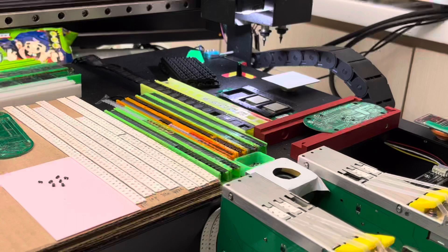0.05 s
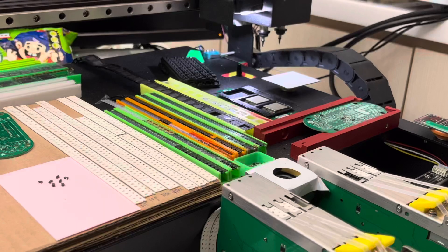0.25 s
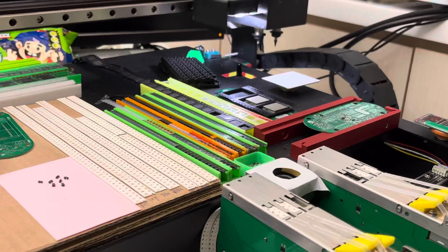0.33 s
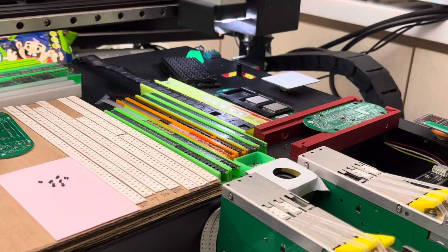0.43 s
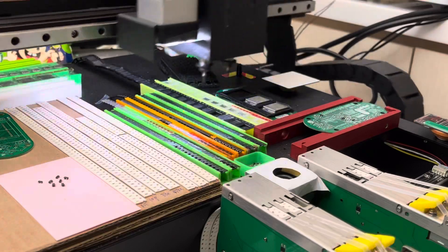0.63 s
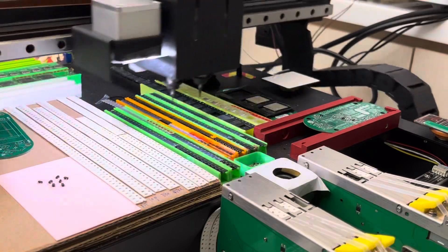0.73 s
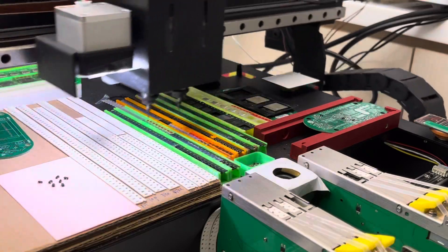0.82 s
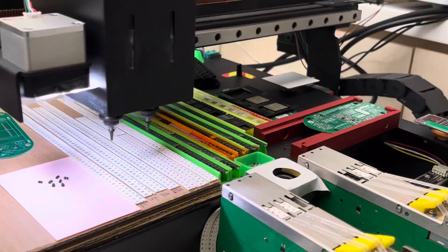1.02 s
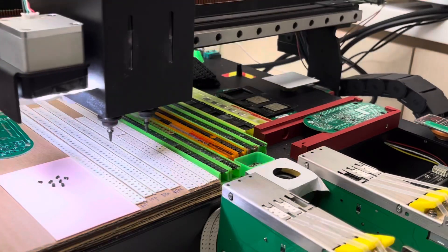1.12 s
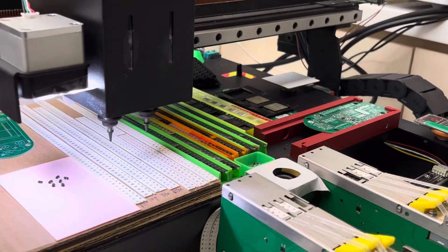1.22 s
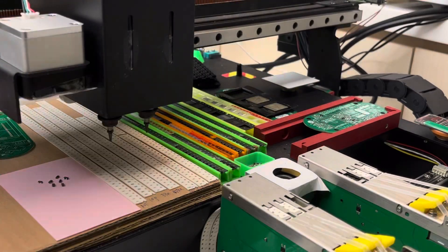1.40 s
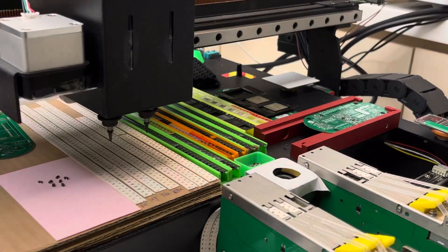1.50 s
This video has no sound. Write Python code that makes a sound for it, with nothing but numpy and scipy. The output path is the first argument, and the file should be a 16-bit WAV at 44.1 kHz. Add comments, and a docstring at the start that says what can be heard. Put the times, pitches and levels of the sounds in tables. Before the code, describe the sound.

A quick motor whir rises and falls as a machine gantry slides, over a low hum.

```python
"""A stepper motor drives the gantry of a desktop pick-and-place machine through one move. Its tones rise and
fall with speed and force the resonances of the frame, while the carriage hisses on its rails, a loose part
buzzes and the cable chain rattles. A valve clicks before the move; afterwards the machine settles with small
knocks over the steady hum of its pump, until a thump as the next move begins."""
import sys
import numpy as np
from scipy import signal
from scipy.fft import rfft, irfft
from scipy.io import wavfile
from scipy.ndimage import uniform_filter1d

SR = 44100
rng = np.random.default_rng(int(sys.argv[2]) if len(sys.argv) > 2 else 0)


def log_audio(samples):
    """Write samples as a 16-bit WAV file to the path given in sys.argv[1]."""
    # one column per channel
    frames = np.atleast_2d(samples).T
    # limit to full scale, then quantise
    limited = np.clip(frames, -1, 1)
    pcm = np.round(limited * 32767).astype(np.int16)
    wavfile.write(sys.argv[1], SR, pcm)


N = 68355

# Spectra give shape only: their levels are relative and per unit bandwidth.
PUMP_HUM = [(60, -59.5), (91.5, -56), (123, -62.5), (6659, -90)]  # hum and a thin whistle: f/Hz, level/dB
PUMP_RUMBLE = [(20, -23), (50, 1), (90, -9), (150, -10), (320, -11), (450, -19.5), (1000, -28.5),
               (4000, -50.5)]  # spectrum: f/Hz, level/dB
HEAD_WHINE = [(270, -93), (317.6, -66.5), (382, -78), (517, -71), (673, -70), (797, -76)]  # partials: f/Hz, relative level/dB
AIR_RUSH = [(100, -30), (300, 2.5), (700, 7), (1100, -4), (1800, -10), (3000, -16), (6500, -18),
            (13500, -19.5), (15000, -25)]  # spectrum: f/Hz, level/dB
AIR_GAIN = [(.05, -5), (.18, -10), (1.15, 0), (1.22, -5.5), (1.29, -5), (1.36, -1), (1.5, 1.5)]  # envelope of air and whine: t/s, gain/dB
VALVE_BLOWS = [(.0797, -44), (.0813, -44.5), (.092, -56), (1.108, -57.5)]  # impacts: t/s, level/dB
VALVE_MODES = [(2340, -8, .026), (7000, -13, .006), (11700, -14, .006), (13700, -13, .006)]  # modes: f/Hz, relative level/dB, T60/s
VALVE_CRACK = [(1000, -35), (2400, -7.5), (5000, -7), (7000, 4.5), (9000, -1), (13500, 6), (15500, -2.5)]  # spectrum: f/Hz, level/dB
MOTOR_PITCH = [(0.2, 24.86), (0.26, 94.8), (0.315, 193.7), (0.36, 266.9), (0.402, 353.1), (0.46, 460.4),
               (0.55, 632.6), (0.6, 688), (0.65, 696), (0.705, 685.4), (0.754, 602.4), (0.842, 442),
               (0.9, 353.4), (0.98, 211.7), (1.04, 114.2), (1.11, 30.9)]  # main tone, proportional to speed: t/s, f/Hz
DRIVE_GAIN = [(.21, -1), (.31, -0.5), (.38, -0.5), (.44, 1.5), (.51, 2), (.64, -4), (.8, -1), (.9, -0.5),
              (.98, -2), (1.08, -1.5), (1.13, -6)]  # envelope of the force on the frame: t/s, gain/dB
# motor partials: ratio to the main tone, force level/dB (starting, full speed, stopping), flutter/1
MOTOR_PARTIALS = [(.26, -62, -43.5, -55, 0.042), (.52, -32, -37.5, -30, 0.015),
                  (1, -39, -33.5, -35.5, 0.0047), (2.04, -33.5, -64.5, -30, 0.0612),
                  (2.8, -43.5, -67.5, -43.5, 0.0302)]
# frame modes: f/Hz, bandwidth/Hz, gain for tones/dB, judder drive/dB (starting, full speed, stopping)
FRAME_MODES = [(194.8, 26, 2.5, -48.5, -42.5, -39.5), (213.7, 49, -2, -44.5, -53.5, -44.5),
               (267.1, 17.1, 1.5, -40.5, -45.5, -37.5), (375, 27.5, -13.5, -61.5, -46, -51),
               (418.6, 45.2, 2, -67, -47, -52.5), (556, 67.5, -2, -48, -51, -67),
               (695, 46, -1.5, -60.5, -46, -60.5), (817, 72, -11.5, -61, -57.5, -61),
               (899, 35, -28, -65.5, -60, -80), (1184, 82, -19, -92, -49.5, -76),
               (1804, 234, -21, -84, -52.5, -84)]
RAIL_ROLL = [(50, -26), (90, 8.5), (200, 4), (400, -2), (800, -2), (1100, -1), (1500, -2.5), (2000, -7),
             (2800, -14.5), (5000, -19), (15000, -27)]  # spectrum of the bearings: f/Hz, level/dB
BELT_HISS = [(500, -13), (2000, 0.5), (3200, 2.5), (5000, -1.5), (7200, 1.5), (8400, -3.5), (10000, 3),
             (12000, 0), (13700, 2.5), (15500, -5)]  # spectrum, also of a knock's tick: f/Hz, level/dB
HISS_ENVELOPE = [(.2, -81.5), (0.268, -65), (.34, -59), (.47, -51.5), (.55, -46), (.71, -44), (.79, -49),
                 (0.891, -51.5), (1.04, -66.5), (1.12, -85)]  # swell of the hiss: t/s, level/dB
LOOSE_RASP = [(300, -0.5), (600, 1.5), (830, 7), (1150, 1), (1450, -14), (1900, -10.5), (3000, -12.5),
              (15000, -36)]  # spectrum of the loose part: f/Hz, level/dB
BENCH_BOOM = [(.2, 70.2, -58), (.25, 65.8, -52), (.35, 74, -76), (.45, 81, -43), (.54, 80, -45),
              (.6, 90.5, -46), (.66, 81.8, -44.5), (.73, 80.5, -41.5), (.78, 85, -59), (.86, 95.7, -52),
              (.96, 102, -52.5), (1.06, 100.1, -48.5), (1.135, 88, -45.5), (1.17, 85, -59)]  # low gliding tone: t/s, f/Hz, level/dB
KNOCK_BLOWS = [(0.21, -41.5, -83, -58, 0.04), (1.04, -34, -59.5, -76, 0.01), (1.228, -54, -99, -60, 0.084),
               (1.32, -56, -67, -54.5, 0.04), (1.535, -38, -69, -61.5, 0.18)]  # impacts: t/s, thud/dB, tick/dB, clack/dB, decay time/s
THUD = [(40, -14), (90, 1.5), (170, 10.5), (300, -21), (700, -8.5), (1000, -34.5), (2000, -31.5),
        (4000, -35), (15000, -89)]  # spectrum: f/Hz, level/dB
CLACK = [(300, 3), (800, 10.5), (1900, 0.5), (3000, -10.5), (6000, -20.5), (15000, -32)]  # spectrum for knocks and chain: f/Hz, level/dB
CHAIN_BLOWS = [(.422, -43), (.441, -40), (.457, -42), (.473, -41.5), (.527, -47), (.853, -43.5),
               (.872, -46)]  # impacts of the links: t/s, level/dB
CHAIN_MODES = [(802, 3, 0.05), (883, -2, 0.048), (1010, -2.5, .055), (1400, -11, 0.043), (2000, -15, 0.04)]  # modes: f/Hz, relative level/dB, T60/s
THIN_TONE = [(.59, 935, -62), (.65, 908, -52), (.7, 890, -49), (.73, 848, -56), (.78, 836, -52),
             (.82, 880, -54), (.86, 910, -53), (.91, 895, -66)]  # high gliding tone: t/s, f/Hz, level/dB
STEREO_WIDTH = [(60, -17), (300, -8), (700, -1.5), (1400, 1), (2200, -16.5), (3000, -5.5), (4400, -28),
                (6500, -2.5), (8400, -49), (10000, 7), (15000, -32)]  # spread of the noises: f/Hz, side minus mid/dB
LEFT_LAG = [(4900, 0), (6800, 1.2), (7850, 3.05), (8850, 3.22), (11100, 6.1), (13000, 6.6), (14200, 8.2),
            (14750, 9.35), (16000, 9.45)]  # treble phase lag of the left channel behind the right: f/Hz, phase/rad

FULL_SPEED_HZ = 700
START_S, STOP_S, ATTACK_S, RELEASE_S = 0.198, 1.094, 0.0041, 0.037


def undb(db):
    """Amplitude ratio of a level in decibels."""
    return 10 ** (np.asarray(db) / 20)


def unit(x):
    """Normalisation to rms 1."""
    return x / np.sqrt(np.mean(x ** 2))


def clock():
    """Sample times in seconds."""
    return np.arange(N) / SR


def curve(points):
    """Linear interpolation in time between (t, value) points."""
    return np.interp(clock(), *np.array(points).T)


def drift(rate_hz):
    """Smoothed random steps form a slow modulation of rms 1."""
    size = int(SR / rate_hz)
    steps = np.repeat(rng.standard_normal(N // size + 1), size)
    return unit(uniform_filter1d(uniform_filter1d(steps, size), size)[:N])


def response(points):
    """Magnitude response, interpolated in level over log frequency."""
    hz, db = np.array(points, float).T
    return undb(np.interp(np.log(np.fft.rfftfreq(N, 1 / SR) + 1), np.log(hz), db))


def noise(spectrum):
    """Independent mid and side signals add to partly coherent stereo noise of rms 1."""
    mid, side = rfft(rng.standard_normal((2, N))) * response(spectrum)
    width = response(STEREO_WIDTH)
    return unit(irfft(np.array([mid + width * side, mid - width * side]) / np.hypot(1, width), N))


def tone(hz, flutter, flutter_hz, rough_db, rough_hz):
    """A sinusoid of rms 1 undergoes random frequency and amplitude modulation."""
    phase = 2 * np.pi * np.cumsum(hz * (1 + flutter * drift(flutter_hz))) / SR
    return np.sqrt(2) * undb(rough_db * drift(rough_hz)) * np.sin(phase)


def resonate(x, hz, width_hz):
    """A damped resonator with unit gain at its natural frequency."""
    return signal.lfilter(*signal.iirpeak(hz, hz / width_hz, fs=SR), x)


def room(x, wet_db, t60=0.2, low_hz=179):
    """Reverberation adds an exponentially decaying diffuse field to the direct sound."""
    tail = rng.standard_normal((2, N)) * np.exp(-np.log(1000) * clock() / t60)
    tail = signal.sosfilt(signal.butter(2, low_hz, "high", fs=SR, output="sos"), tail)
    tail /= np.sqrt(np.sum(tail ** 2, axis=1, keepdims=True))
    return x + undb(wet_db) * signal.fftconvolve(x[None], tail, axes=1)[:, :N]


def hum(partials):
    """Superposed partials, each wavering slightly, form a line spectrum."""
    return sum(undb(db) * tone(hz, flutter=0.00382, flutter_hz=5.4, rough_db=0.5, rough_hz=14.52)
               for hz, db in partials)


def idle_machine():
    """Tones lie over broadband noise: the pump hums; the head's whine and air grow once it is near."""
    pump = hum(PUMP_HUM) + undb(-57) * noise(PUMP_RUMBLE)
    head = hum(HEAD_WHINE) + undb(-61) * noise(AIR_RUSH)
    return pump + undb(curve(AIR_GAIN)) * head


def strike(blows, modes, crack, crack_db, crack_s=0.0027, scatter_db=2):
    """Each impact gives a noise burst and excites damped modes in a slightly different mixture."""
    out = 0
    for at, blow_db in blows:
        age = np.maximum(clock() - at, 0)
        ring = 0
        for hz, db, t60 in modes:
            polarity, scatter = rng.standard_normal(2)
            amplitude = np.sign(polarity) * undb(db + scatter_db * scatter)
            ring += amplitude * np.sin(2 * np.pi * hz * age) * np.exp(-np.log(1000) * age / t60)
        burst = undb(crack_db) * noise(crack)[0] * (age > 0) * np.exp(-age / crack_s)
        out += undb(blow_db) * (ring + burst)
    return out


def valve():
    """Impact excitation: a valve snaps and bounces, then ticks faintly as the move ends."""
    return room(strike(VALVE_BLOWS, VALVE_MODES, VALVE_CRACK, crack_db=2), wet_db=-7)


def gain_at_speed(start_db, full_db, stop_db, speed):
    """Level varies linearly with speed, on one slope before the peak and another after."""
    slow_db = np.where(np.arange(N) < np.argmax(speed), start_db, stop_db)
    return undb(slow_db + (full_db - slow_db) * speed)


def motor(speed, drive, bass_cut_hz=166, direct_db=-38):
    """Forced vibration: stepper tones sweep through the modes of a frame that radiates little bass."""
    force = 0
    for ratio, start_db, full_db, stop_db, flutter in MOTOR_PARTIALS:
        hz = ratio * FULL_SPEED_HZ * speed
        partial = tone(hz, flutter, flutter_hz=69.98, rough_db=1.33, rough_hz=59)
        force += gain_at_speed(start_db, full_db, stop_db, speed) * partial
    force = signal.sosfilt(signal.butter(4, bass_cut_hz, "high", fs=SR, output="sos"), drive * force)
    ringing = sum(undb(db) * resonate(force, hz, width) for hz, width, db, *_ in FRAME_MODES)
    return undb(direct_db) * force + ringing


def judder(speed, drive):
    """Random excitation keeps the frame's modes ringing: a growl at a crawl, higher rings at speed."""
    out = 0
    for hz, width, _, start_db, full_db, stop_db in FRAME_MODES:
        push = resonate(rng.standard_normal(N), hz, 2 * width)
        push /= np.std(resonate(push, hz, width))
        gain = drive * gain_at_speed(start_db, full_db, stop_db, speed ** 0.75)
        out += resonate(push * gain, hz, width)
    return out


def rails(speed, moving):
    """Rolling noise grows in proportion to speed; the hiss of belt and chain swells in mid-move."""
    roll = undb(-42) * speed * noise(RAIL_ROLL)
    hiss = undb(curve(HISS_ENVELOPE)) * noise(BELT_HISS)
    grain = undb(drift(400))  # 1 dB rms
    return moving * grain * (roll + hiss)


def loose_part(shake, speed, hz=422, width_hz=157):
    """Sympathetic vibration: a loose part chatters once a cycle as motor tones cross its resonance."""
    swing = resonate(resonate(shake, hz, width_hz), hz, 2 * width_hz)
    contact = np.maximum(swing, 0) * speed
    return undb(-55) * unit(contact) * noise(LOOSE_RASP)


def glide(points, **modulation):
    """A modulated tone follows a path of frequency and amplitude, silent beyond its ends."""
    at, hz, db = np.array(points).T
    amplitude = np.interp(clock(), at, undb(db), left=0, right=0)
    return amplitude * tone(np.interp(clock(), at, hz), flutter_hz=60.15, rough_hz=49.9, **modulation)


def bench_boom():
    """Structure-borne sound: the bench booms under the moving gantry."""
    return glide(BENCH_BOOM, flutter=0.1238, rough_db=0.5)


def knocks(rise_s=0.003):
    """Impacts of head and frame decay exponentially, each a blend of thud, tick and clack."""
    out = 0
    for at, thud_db, tick_db, clack_db, decay_s in KNOCK_BLOWS:
        age = np.maximum(clock() - at, 0)
        envelope = (1 - np.exp(-age / rise_s)) * np.exp(-age / decay_s)
        for db, spectrum in (thud_db, THUD), (tick_db, BELT_HISS), (clack_db, CLACK):
            out += envelope * undb(db) * noise(spectrum)
    return out


def cable_chain():
    """Colliding links ring in free vibration during the run-up and the braking."""
    return room(strike(CHAIN_BLOWS, CHAIN_MODES, CLACK, crack_db=-29), wet_db=0)


def thin_tone():
    """Random modulation roughens a thin tone above the motor's main one."""
    return glide(THIN_TONE, flutter=0.022, rough_db=3.5)


def scene():
    """The sources superpose over one move of the gantry."""
    t = clock()
    speed = curve(MOTOR_PITCH) / FULL_SPEED_HZ
    moving = np.clip((t - START_S) / ATTACK_S, 0, 1) * np.exp(-np.maximum(t - STOP_S, 0) / RELEASE_S)
    drive = moving * undb(curve(DRIVE_GAIN))
    shake = motor(speed, drive)
    body = shake + judder(speed, drive) + bench_boom() + thin_tone()
    pan = undb([[0.42], [-0.42]])  # slightly left
    gantry = pan * room(body, wet_db=-12) + rails(speed, moving) + loose_part(shake, speed)
    return gantry + cable_chain() + valve() + knocks() + idle_machine()


def record(dry, silence_s=0.034, fade_s=0.0043, top_hz=15700):
    """The sound fades in after a brief silence, band-limited and out of phase in the treble."""
    lag = np.interp(np.fft.rfftfreq(N, 1 / SR), *np.array(LEFT_LAG).T)
    shifted = irfft(rfft(dry) * np.exp(.5j * np.array([-lag, lag])), N)
    heard = shifted * np.clip((clock() - silence_s) / fade_s, 0, 1)
    return signal.sosfilt(signal.ellip(8, .2, 70, top_hz, fs=SR, output="sos"), heard)


dry = scene()
out = record(dry)
log_audio(out)
```